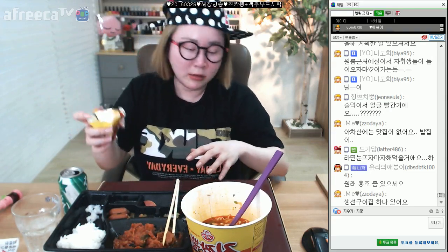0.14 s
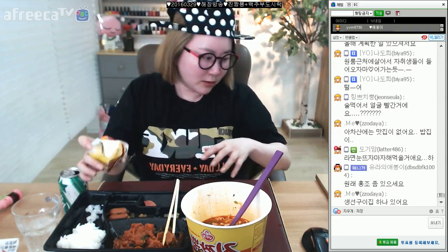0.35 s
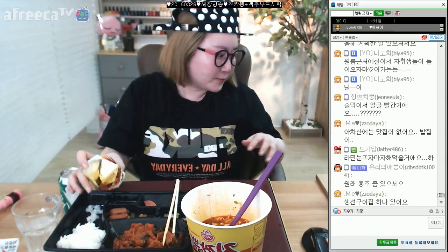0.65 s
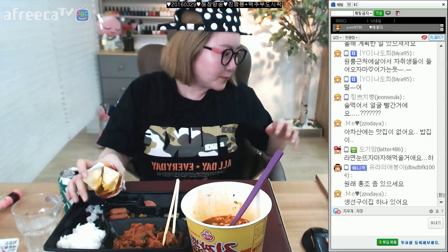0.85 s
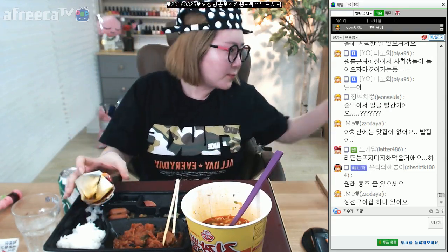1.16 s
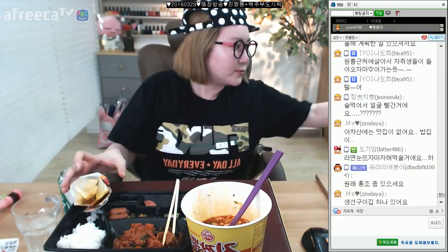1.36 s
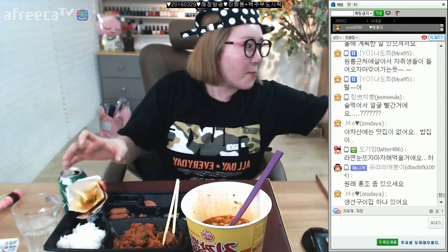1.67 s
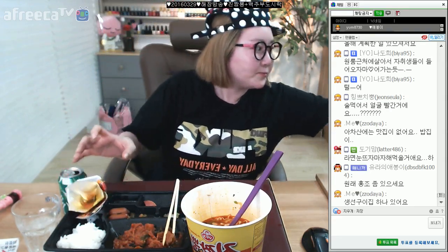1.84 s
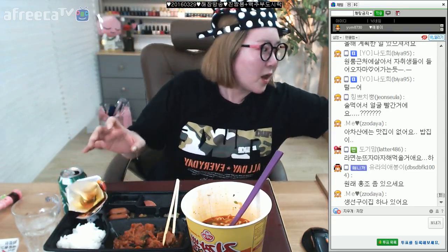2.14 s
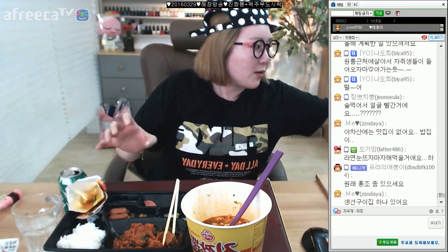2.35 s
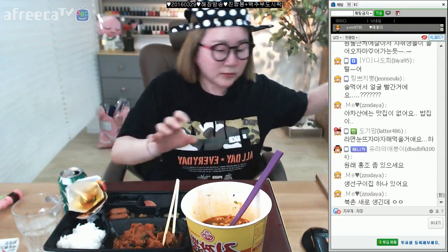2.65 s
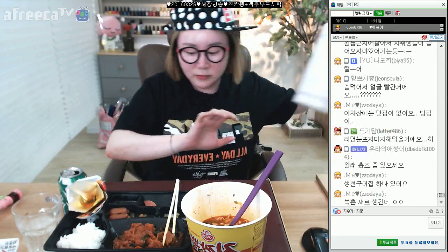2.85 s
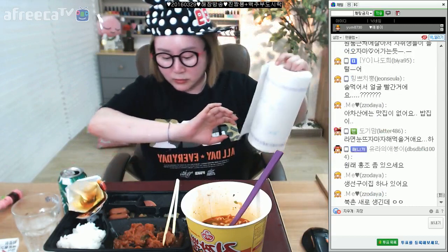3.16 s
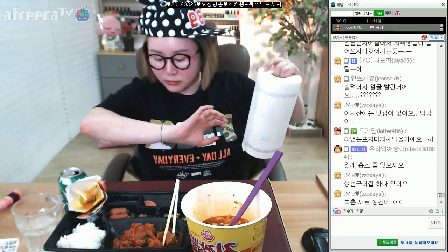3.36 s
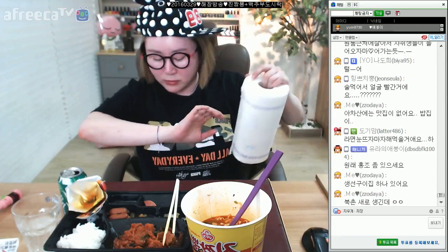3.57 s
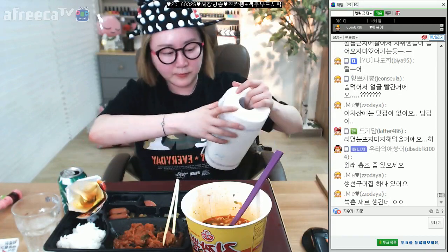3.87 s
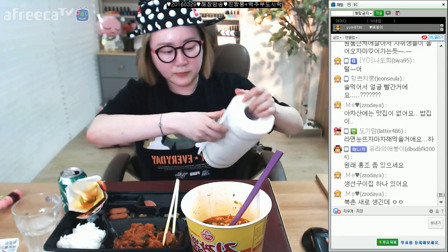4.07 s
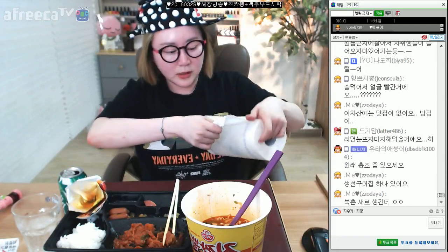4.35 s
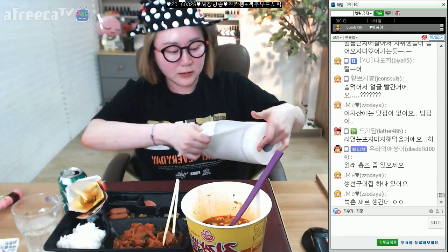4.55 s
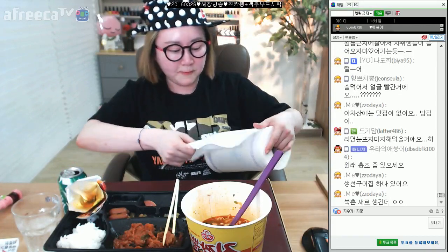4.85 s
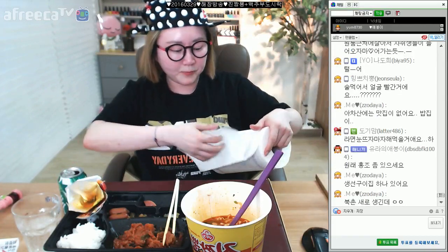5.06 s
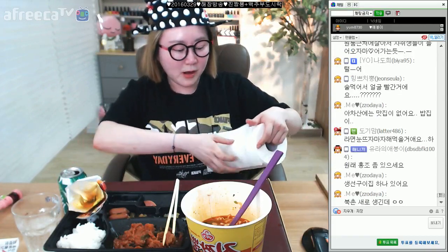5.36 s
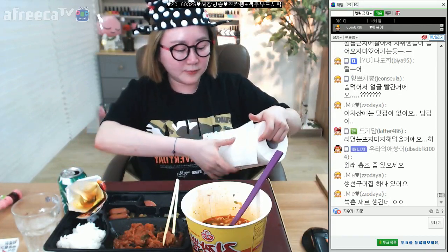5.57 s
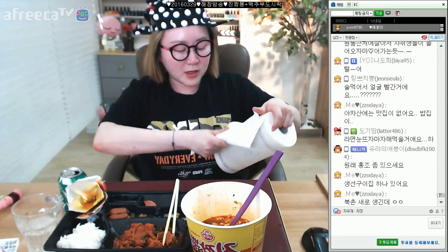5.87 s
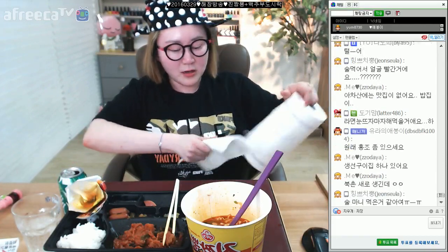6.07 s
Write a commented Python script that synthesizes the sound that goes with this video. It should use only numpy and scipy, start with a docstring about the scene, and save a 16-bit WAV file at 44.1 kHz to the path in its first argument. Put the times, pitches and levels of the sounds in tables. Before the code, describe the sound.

Over a steady electrical hum come small plastic clicks, a loud bump, soft rustling of a paper towel roll and one quick tear.

```python
"""At a desk in a small room, a wrapped snack clicks and crinkles as it is laid on a plastic tray.
A paper towel roll is fetched from the side: it bumps the furniture, slides free, and its cardboard core
rattles with a hollow note. Hands turn and unwind it with a soft rustle, then rip off a sheet, snapping
the tiny paper bridges of the perforation. A fan whirs behind it all. A close microphone picks it up with
a low electrical hum, and a limiter turns down the loudest moments."""
import sys
import numpy as np
from scipy import signal
from scipy.fft import rfft, irfft, next_fast_len
from scipy.io import wavfile
from scipy.ndimage import uniform_filter1d, minimum_filter1d, map_coordinates

SR = 44100
rng = np.random.default_rng(int(sys.argv[2]) if len(sys.argv) > 2 else 0)


def master(y):
    """Save y as 16-bit WAV."""
    cut = np.clip(np.atleast_2d(y).T, -1, 1)
    pcm = np.round(cut * 32767)  # scale
    wavfile.write(sys.argv[1], SR, pcm.astype(np.int16))


N = 273993

# Levels are relative: they compare the rows of a table. t60 is the time a sound needs to fade by 60 dB.
# how long the room echoes at each pitch: f/Hz, t60/s
ROOM = [(150, .28), (600, .27), (2500, .24), (12000, .2)]
# tones of the low electrical hum: f/Hz, level/dB
HUM = [(58.535, -31.8), (117.07, -61)]
# the fan's narrow bands of noise: f/Hz, width/Hz, level/dB
FAN = [(121.5, 11, -65.5), (145.8, 17, -56.5)]
# tone colours (how strong each pitch is) of the room's air and low rumble: f/Hz, level/dB
AIR = [(100, -40), (170, -6), (230, -4), (400, -5), (660, -7), (1200, -11), (1600, -16), (2500, -21),
       (4500, -29), (6800, -27), (10000, -33), (13000, -39), (15800, -46)]
RUMBLE = [(20, 3.5), (40, -4), (90, -4.5), (170, -15), (300, -28), (1000, -110)]

# wrapper and tray clicks: t/s, level/dB, f/Hz, width/Hz, bright edge against the ring/dB, t60/s
CLICKS = [(0.136, -27.5, 2270, 280, 0, 0.014), (0.762, -37.5, 2000, 400, -1, .047),
          (0.799, -32.5, 1930, 500, -1, 0.074), (0.881, -22, 1980, 420, -18, 0.033),
          (0.906, -23, 2050, 400, -13, .045), (0.932, -31, 6500, 1500, -1, .025),
          (0.966, -27.5, 5100, 400, 3.5, 0.094), (0.969, -24.5, 1700, 1200, -6, 0.04),
          (0.998, -31.5, 6200, 2000, -1, 0.1), (1.089, -40, 2260, 450, -5, 0.089),
          (1.5288, -13, 2650, 1000, -11, 0.01), (1.533, -33, 1000, 1200, -2, .07)]
# crisp tone colour of clicks and creases: f/Hz, level/dB
CRISP = [(500, 4), (1200, 2), (2500, 3.5), (4200, -3.5), (6700, 2.5), (9000, -7), (12000, -11),
         (15800, -26)]
# pitches at which the tray rings: f/Hz, width/Hz, level/dB
TRAY = [(1000, 400, 9), (1780, 180, 19), (2060, 280, 25), (4580, 150, 8), (6400, 250, 13)]

# bumps on the furniture: t/s, thud/dB, clatter/dB
BUMPS = [(0.802, -34, -46), (1.8248, -6.5, -20), (1.831, -10, -11), (1.846, -17.5, -18.5),
         (1.8665, -23, -28)]
# notes of the struck furniture: f/Hz, level/dB, t60/s
FURNITURE_NOTES = [(151, 0, 0.16), (174, -3, 0.1), (205, -1, .13), (277, -14, 0.18), (396, -11.5, 0.2),
                   (461, -8, 0.09), (526, -5.5, 0.07), (585, -5, 0.13), (753, -13, 0.09), (945, -9, 0.1),
                   (1031, -14, .09)]
# tone colour of loose things clattering: f/Hz, level/dB
CLATTER = [(120, -39), (200, -13), (231, -13), (379, -2), (679, -2.5), (943, -4.5), (1440, -14.5),
           (1820, -10), (2500, -14), (2980, -18.5), (3380, -16), (7420, -33), (13500, -39), (15700, -50)]

# the roll rattling free: t/s, knock/dB, scuff/dB
RATTLE = [(2.083, -37, -21.5), (2.097, -24, -45), (2.127, -29, -36.5), (2.146, -38, -38), (2.179, -40, -44),
          (2.231, -41, -45)]
# notes of its hollow core: f/Hz, level/dB, t60/s
CORE_NOTES = [(413, -13, 0.13), (540, -8.5, 0.12), (579, -7.5, 0.12), (633, 2, 0.17), (790, -9, 0.11),
              (843, -8.5, .14), (955, -16, .1)]
# tone colours of the roll sliding, scuffing and brushing past something: f/Hz, level/dB
SLIDE_HISS = [(710, -26), (1200, -8), (1830, -16), (2140, -13), (2360, 1), (2780, -10), (3520, -4),
              (3920, -11), (5950, -11.5), (6700, -7), (8050, -5), (8680, -6), (9450, -7.5), (12400, -20),
              (15700, -20)]
SCUFF = [(180, -36), (300, -10), (1110, 2), (2260, -7), (3480, -8.5), (4840, -12), (5260, -13),
         (6310, -12.5), (8350, -16), (15700, -29)]
BRUSH = [(300, -17), (650, 0), (1600, -3.5), (4300, -11), (7500, -9), (12500, -13), (15700, -18)]

# strokes of the hands over the paper: t/s, length/s, rustle/dB, hiss/dB
HAND_STROKES = [(2.438, 0.082, -49.5, -58), (3.803, .085, -48, -52), (3.914, 0.28, -45.5, -48.5),
                (4.002, 0.028, -40, -43.5), (4.218, 0.1, -39, -45), (4.36, 0.12, -42.5, -48.5),
                (4.455, 0.13, -36, -46.5), (4.59, 0.07, -40.5, -52), (4.66, 0.07, -42.5, -51.5),
                (4.751, 0.045, -45, -42), (4.782, 0.075, -38.5, -55), (4.93, .15, -46, -55),
                (5.245, .04, -55, -52), (5.574, 0.055, -48.5, -58), (5.665, 0.2, -39.5, -48),
                (5.75, 0.15, -41, -45.5)]
# creases flicking over: t/s, level/dB
CREASES = [(2.228, -42), (4.106, -42), (4.487, -37.5), (4.775, -39), (4.799, -35.5), (5.04, -42.5),
           (5.282, -44.5), (5.344, -45), (5.372, -48.5), (5.577, -38.5), (5.606, -39), (5.715, -38.5)]
# fingers catching on the roll: t/s, level/dB, swell/s, pitch ratio
RUBS = [(3.882, -45, .01, .7), (3.953, -35, 0.008, 1.15), (4.005, -37, 0.017, 1.07),
        (4.046, -27, 0.012, 1.03), (4.072, -30, 0.0062, .85), (4.288, -40, .014, .45),
        (5.582, -34.5, 0.0075, 0.93), (5.611, -34.5, 0.0065, 0.9)]
# tone colours of the paper's rustle, its hiss and a rubbing finger: f/Hz, level/dB
PAPER_RUSTLE = [(71, -34), (120, -5), (177, -9), (301, -6), (352, -14), (405, -2.5), (1100, 2), (1210, -1),
                (1580, 1), (5000, -14.5), (6500, -46), (11000, -120)]
PAPER_HISS = [(2060, -11), (3500, -3), (4200, -12), (5670, -2.5), (6980, -0.5), (9370, -10), (12000, -8.5),
              (13700, -14.5), (15700, -22)]
FINGER = [(250, -9), (550, -8), (750, -4), (1150, 7), (1500, -3.5), (1900, -13), (2300, -9.5),
          (3600, -15.5), (4300, -34), (9000, -47)]
# pulls that unwind the sheet: t/s, length/s, starting f/Hz, level/dB
PULLS = [(4.521, 0.14, 676, -47.5), (4.791, .14, 948, -45.5)]

# paper bridges snapping: t/s, pluck/dB, crack/dB, pitch ratio
SNAPS = [(5.911, -28, -17, 1), (5.9193, -22, -8.5, 1), (5.9215, -16, -7, 1.05), (5.9262, -11, -22, 1.05),
         (5.931, -12, -25, 1), (5.947, -15, -22, 1.5), (5.950, -3.5, -26, 1.05), (5.959, 1.5, -21, 1),
         (5.9652, 1.5, -21, .97), (5.9812, 0, -15, 1), (5.9864, -9, -22, 1), (5.998, -11, -30, .85),
         (6.005, -16, -42, .85)]
# notes of the tight sheet: f/Hz, level/dB, t60/s
SHEET_NOTES = [(660, -19, 0.055), (900, -12, 0.017), (1100, -5, 0.02), (1950, -7, 0.0084),
               (3300, -29, 0.0093)]
# tone colours of the fluttering sheet, tearing fibres and cracking bridges: f/Hz, level/dB
FLUTTER = [(100, -3), (350, -14.5), (650, -5), (850, -2.5), (1130, -1.5), (1400, -7), (1950, -5),
           (2500, -13), (3200, -11.5), (4200, -30), (8000, -47)]
FIBRES = [(800, 4.5), (2500, 6.5), (4200, -3.5), (6000, 2), (7600, -1.5), (9000, -9.5), (12000, -11.5),
          (15800, -39)]
CRACK = [(600, -6), (1500, 2), (2800, 8), (4200, -1), (6300, 2), (9000, -7), (12000, -12), (15800, -30)]


def amp(db):
    """Turn decibels into a number to multiply by."""
    return 10 ** (np.asarray(db) / 20)


def unit(x):
    """Scale a sound to an average strength (rms) of 1."""
    return x / np.sqrt(np.mean(x ** 2) + 1e-20)


def along(points, hz):
    """Read between the rows of an (f/Hz, value) table, with octaves evenly spaced."""
    pitches, values = np.transpose(points)
    return np.interp(np.log(hz + 1), np.log(pitches + 1), values)


def clock():
    """The time of every sample, in seconds."""
    return np.arange(N) / SR


def noise():
    """White noise: an even hiss."""
    return rng.standard_normal(N)


def wobble(per_s):
    """A smooth curve through per_s random values a second."""
    return map_coordinates(rng.standard_normal(int(N * per_s / SR) + 4), [clock() * per_s])


def filtered(x, response):
    """Multiply each frequency in x by response(frequency)."""
    size = next_fast_len(N + SR // 2)
    return irfft(rfft(x, size) * response(np.fft.rfftfreq(size, 1 / SR)), size)[:N]


def coloured(x, colour):
    """Give x a tone colour, at strength 1."""
    return unit(filtered(x, lambda hz: amp(along(colour, hz))))


def noise_band(hz, spread_hz):
    """Noise around one pitch, half as strong spread_hz to either side."""
    return unit(filtered(noise(), lambda f: 1 / (1 + ((f - hz) / spread_hz) ** 2)))


def resonated(x, peaks):
    """Let x ring at each of the peaks, at strength 1."""
    def response(f):
        return sum((-1) ** k * amp(db) * 1j * f * width / (hz * hz - f * f + 1j * f * width)
                   for k, (hz, width, db) in enumerate(peaks))
    return unit(filtered(x, response))


def cut_bass(x, edge_hz, order):
    """Weaken the low notes: small or light surfaces give off little bass."""
    return signal.sosfilt(signal.butter(order, edge_hz, "highpass", fs=SR, output="sos"), x)


def crackle(per_s, grain_db):
    """Tiny fibre slips at random moments, over smooth rubbing noise."""
    slips = noise() * (rng.random(N) < per_s / SR)
    return unit(noise() + amp(grain_db) * unit(slips))


def blow(start_s, t60, rise_s):
    """The loudness of one hit: a quick rise, then a fade."""
    t = np.maximum(clock() - start_s, 0)
    return amp(-60 * t / t60) * (1 - np.exp(-t / rise_s))


def stroke(start_s, length_s, rise_s, t60, sag_db_per_s=0):
    """The loudness of one movement: it rises, holds, then fades. Sag lowers it; negative sag swells it."""
    t = np.maximum(clock() - start_s, 0)
    rise = np.sin(np.pi / 2 * np.minimum(t / rise_s, 1)) ** 2
    return rise * amp(-sag_db_per_s * t - 60 * np.maximum(t - length_s, 0) / t60)


def ring(start_s, notes, scatter_db, detune):
    """The fading notes of a struck object, a little different in level and pitch each time."""
    t = np.arange(SR // 2) / SR
    chance = rng.standard_normal((len(notes), 2))
    tone = 0
    for (hz, db, t60), (louder, higher) in zip(notes, chance):
        fade = amp(db + scatter_db * louder - 60 * t / t60)
        tone += fade * np.sin(2 * np.pi * hz * (1 + detune * higher) * t)
    return np.pad(tone, (round(start_s * SR), N))[:N]


def room(x, echo_db):
    """The direct sound plus a wash of echoes whose treble dies first."""
    hz, t, spectrum = signal.stft(rng.standard_normal(SR // 2), SR, nperseg=256)
    fade = amp(-60 * t / along(ROOM, hz)[:, None])
    tail = signal.istft(spectrum * fade, SR, nperseg=256)[1]
    tail = np.pad(tail / np.linalg.norm(tail), (SR // 400, 0))  # echoes arrive 2.5 ms late
    return x + amp(echo_db) * signal.fftconvolve(x, tail)[:N]


def background():
    """Steady electrical hum, a computer fan, and the air and rumble of the room."""
    hum = sum(amp(db) * np.sqrt(2) * np.sin(2 * np.pi * hz * clock()) for hz, db in HUM)
    fan = sum(amp(db) * noise_band(hz, width / 2) for hz, width, db in FAN)
    air = amp(-50) * coloured(noise(), AIR)
    rumble = amp(-49.5) * coloured(noise(), RUMBLE)
    return hum + fan + air + rumble


def snack(start_s=0.804):
    """The wrapper skids and crinkles on the thin tray; each click rings at its own pitch."""
    edge = coloured(noise(), CRISP)
    clicks = 0
    for at, db, hz, width, edge_db, t60 in CLICKS:
        tone = noise_band(hz, width / 1.5) + amp(edge_db) * edge  # hard clicks have more edge
        clicks += amp(db - 8.5) * blow(at, t60, rise_s=0.00044) * tone
    folds = crackle(900, grain_db=-4)
    settle = amp(-43.5) * stroke(start_s, length_s=0.125, rise_s=0.115, t60=0.52)
    skid = amp(-40) * stroke(start_s, length_s=0.115, rise_s=0.115, t60=0.24)
    return room(clicks + settle * coloured(folds, CRISP) + skid * resonated(folds, TRAY), echo_db=-7.5)


def furniture_bump():
    """Quick hits thud in the furniture and set loose things clattering."""
    hits = sum(amp(db) * ring(at, FURNITURE_NOTES, scatter_db=1.5, detune=0.01) for at, db, _ in BUMPS)
    thud = amp(-4.5) * cut_bass(hits, edge_hz=154, order=4)
    clatter = 0
    for at, _, db in BUMPS:
        shake = amp(db) * blow(at, t60=0.2, rise_s=0.00047)
        clatter += shake * coloured(crackle(1500, grain_db=-5.5), CLATTER)
    return room(thud, echo_db=-10) + room(clatter, echo_db=-10)


def fetch_roll(slide_s=1.95, free_s=2.082):
    """A sleeve rustles, the roll slides free with a rising hiss; knocks and scraping sound its core."""
    reach = amp(-61.5) * stroke(start_s=1.18, length_s=0.345, rise_s=0.04, t60=0.22, sag_db_per_s=-33)
    sleeve = reach * coloured(noise(), CRISP)
    pull = amp(-34) * stroke(slide_s, free_s - slide_s, rise_s=0.12, t60=0.045)
    slide = pull * coloured(crackle(3000, grain_db=-6), SLIDE_HISS)
    knocks = sum(amp(db) * ring(at, CORE_NOTES, scatter_db=2, detune=0.0037) for at, db, _ in RATTLE)
    drag = amp(-27) * stroke(free_s, length_s=0.17, rise_s=0.042, t60=0.33, sag_db_per_s=50)
    rubbing = noise()
    damped_notes = np.multiply(CORE_NOTES, (1, 1, 0.75))  # the core rings less long while it rubs
    core = ring(0, damped_notes, scatter_db=1.5, detune=0.0026)
    scrape = drag * unit(signal.fftconvolve(rubbing, core)[:N])
    touches = sum(amp(db) * blow(at, t60=0.086, rise_s=0.00038) for at, _, db in RATTLE)
    scuffs = (amp(-16) * drag + touches) * coloured(noise(), SCUFF)
    return room(knocks + scrape, echo_db=-9.5) + room(sleeve + slide + scuffs, echo_db=-5.5)


def lift_roll():
    """The edge of the roll brushes past something as it is lifted out."""
    touch = amp(-40) * stroke(start_s=2.556, length_s=0.11, rise_s=0.024, t60=0.18, sag_db_per_s=65)
    return room(touch * coloured(crackle(900, grain_db=-8), BRUSH), echo_db=-10)


def handle_roll():
    """Paper rustles under the hands, creases flick over, and now and then a finger catches."""
    rustle_power = hiss_power = rubs = 0
    for at, length, rustle_db, hiss_db in HAND_STROKES:
        move = stroke(at, length, rise_s=0.036, t60=0.55, sag_db_per_s=6)
        rustle_power += (amp(rustle_db) * move) ** 2  # overlapping noises add up as squares
        hiss_power += (amp(hiss_db) * move) ** 2
    pressure = amp(0.9 * wobble(45))
    rustle = np.sqrt(rustle_power) * coloured(crackle(1200, grain_db=-9.5), PAPER_RUSTLE)
    hiss = np.sqrt(hiss_power) * coloured(crackle(600, grain_db=-3), PAPER_HISS)
    flicks = sum(amp(db) * blow(at, t60=0.085, rise_s=0.00084) for at, db in CREASES)
    creases = flicks * coloured(crackle(680, grain_db=2), CRISP)
    skin = crackle(700, grain_db=-10)
    for at, db, swell, pitch in RUBS:
        catch = amp(db) * np.exp(-0.5 * ((clock() - at) / swell) ** 2)
        rubs += catch * coloured(skin, np.multiply(FINGER, (pitch, 1)))
    return room(pressure * (rustle + hiss) + creases + rubs, echo_db=-10.5)


def unwind_sheet(fall_octaves_per_s=4.7):
    """The free length of sheet drums softly as it is pulled; its note falls as it grows longer."""
    drumming = 0
    for at, length, first_hz, db in PULLS:
        hz = first_hz * 2 ** (-fall_octaves_per_s * np.clip(clock() - at, 0, length))
        flap = noise_band(0, spread_hz=115)
        rough_note = unit(flap * np.sin(2 * np.pi * np.cumsum(hz) / SR))
        drumming += amp(db) * stroke(at, length, rise_s=0.036, t60=0.12) * rough_note
    return room(drumming, echo_db=-9.5)


def rip_sheet(start_s=5.908, length_s=0.095):
    """Fibres crackle first, then the freed sheet flutters; each snapping bridge plucks the tight paper."""
    flap = amp(-17.5) * stroke(start_s, length_s, rise_s=0.016, t60=0.1, sag_db_per_s=72)
    tear = amp(-23) * stroke(start_s, length_s, rise_s=0.0017, t60=0.1, sag_db_per_s=180)
    loose = amp(-56.5) * (clock() > start_s)  # the torn sheet keeps rustling in the hand
    flutter = (flap + loose) * coloured(crackle(1500, grain_db=3), FLUTTER)
    fibres = (tear + loose) * coloured(crackle(1200, grain_db=-3), FIBRES)
    plucks = 0
    for at, db, _, pitch in SNAPS:
        notes = np.multiply(SHEET_NOTES, (pitch, 1, 1))
        plucks += amp(db) * ring(at, notes, scatter_db=1.2, detune=0.025)
    plucks = cut_bass(plucks, edge_hz=510, order=2)
    snaps = sum(amp(db) * blow(at, t60=0.0079, rise_s=0.0003) for at, _, db, _ in SNAPS)
    cracks = snaps * coloured(noise(), CRACK)
    return room(cut_bass(flutter + fibres + plucks + cracks, edge_hz=130, order=2), echo_db=-13)


def scene():
    """All the sounds meet at one microphone."""
    desk = snack() + furniture_bump()
    paper = fetch_roll() + lift_roll() + handle_roll() + unwind_sheet() + rip_sheet()
    return (desk + paper + background())[None]


def record(dry, ceiling=0.8, top_hz=15820):
    """A limiter turns down the loudest hits, peaks are rounded off, and the highest treble is cut."""
    x = dry[0]
    hold, ramp = SR // 20, SR // 500  # 50 ms and 2 ms
    needed_gain = np.minimum(1, ceiling * amp(3) / (np.abs(x) + 1e-9))
    held_gain = minimum_filter1d(needed_gain, hold, origin=hold // 2 - ramp)
    limited = x * uniform_filter1d(held_gain, ramp)
    rounded = limited / (1 + np.abs(limited / ceiling) ** 8) ** (1 / 8)
    return filtered(rounded, lambda hz: hz < top_hz)[None]


dry = scene()
out = record(dry)
master(out)
```